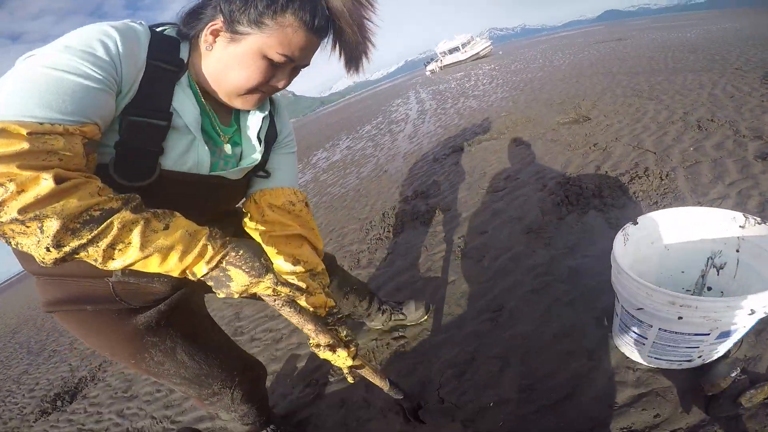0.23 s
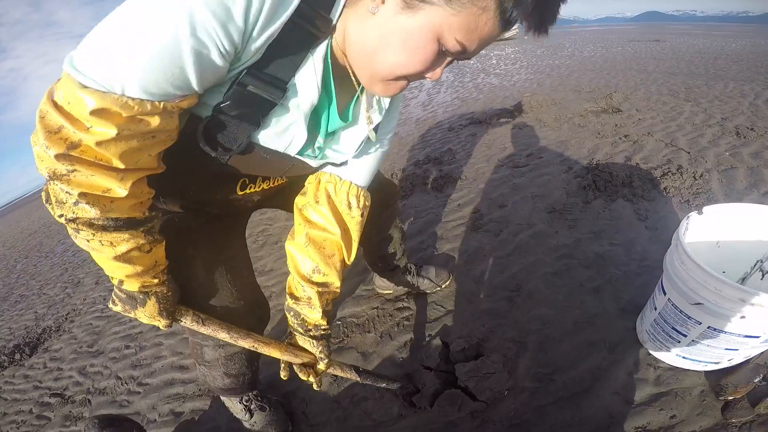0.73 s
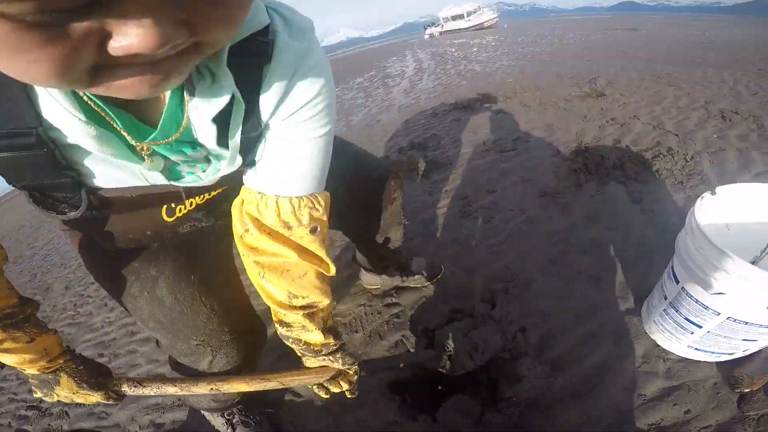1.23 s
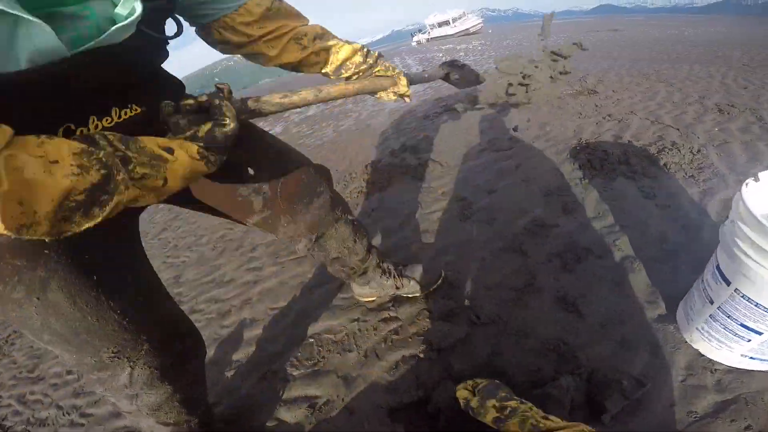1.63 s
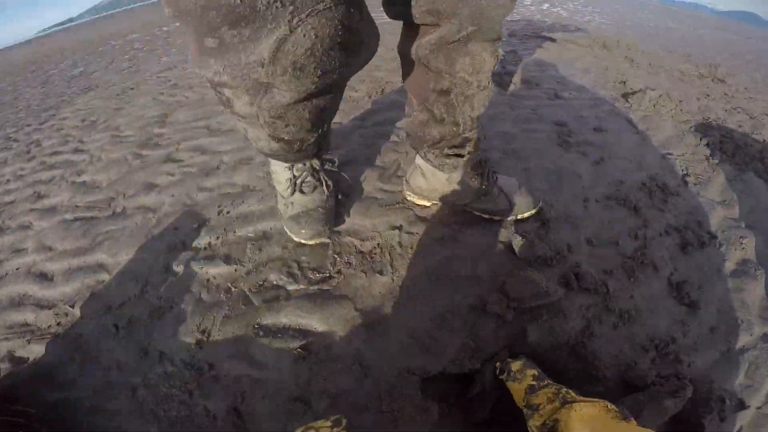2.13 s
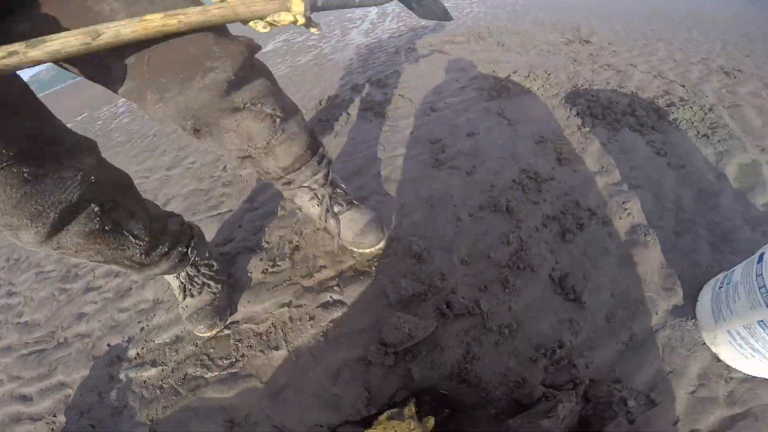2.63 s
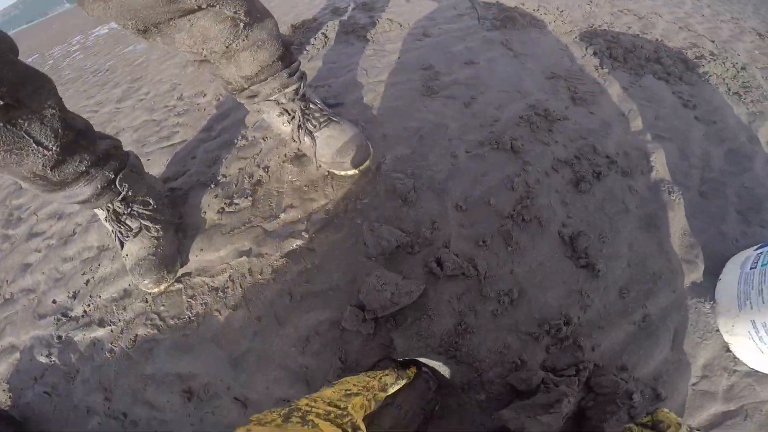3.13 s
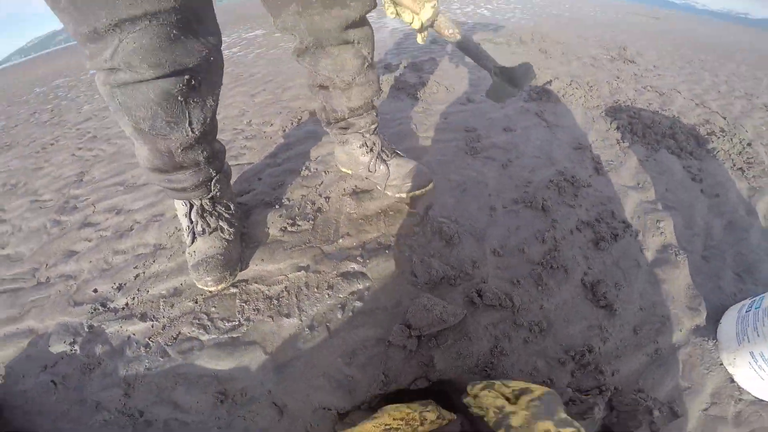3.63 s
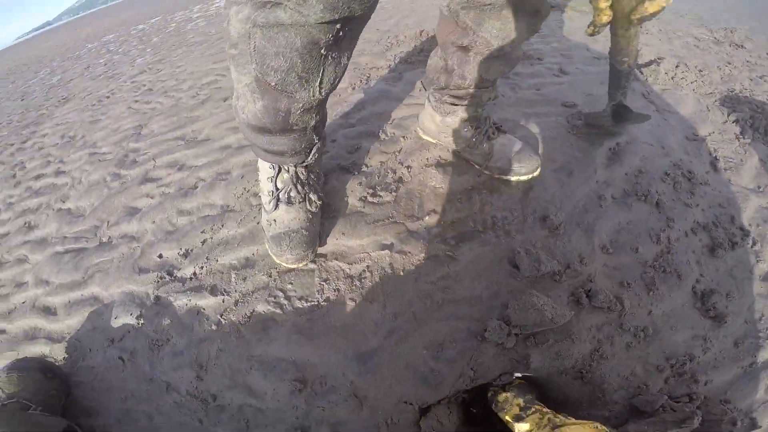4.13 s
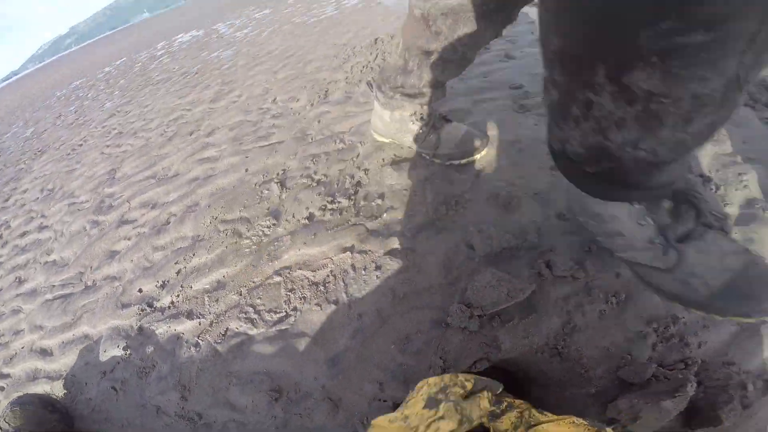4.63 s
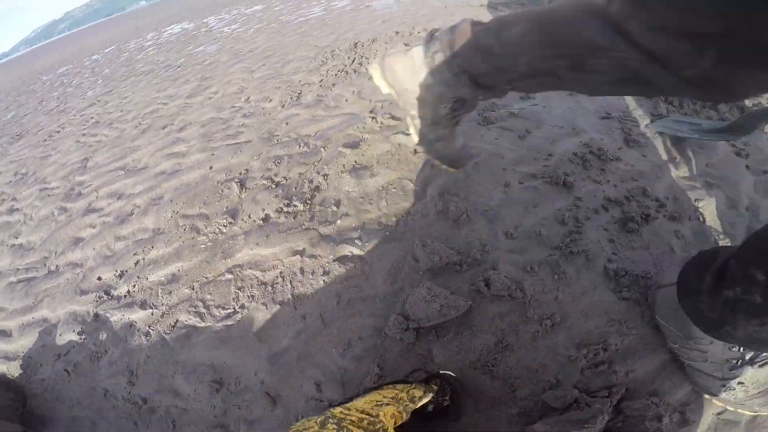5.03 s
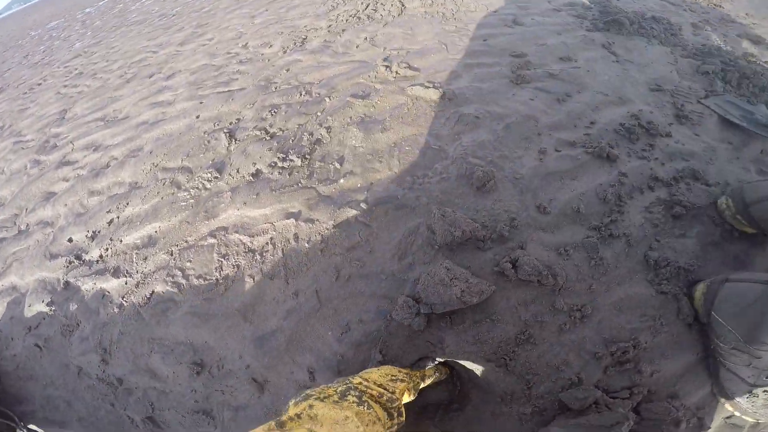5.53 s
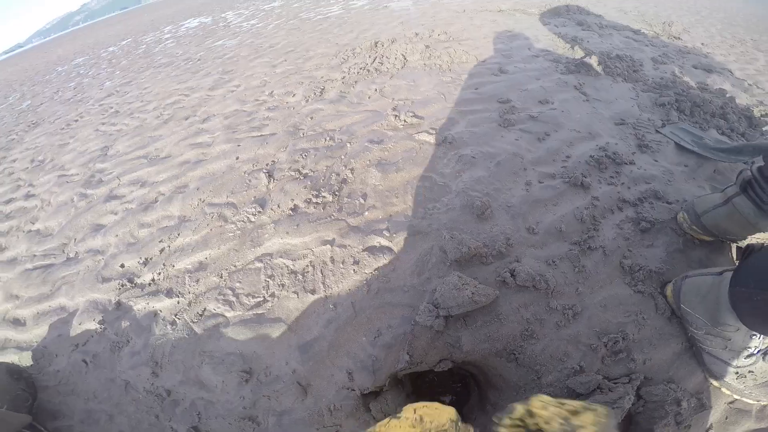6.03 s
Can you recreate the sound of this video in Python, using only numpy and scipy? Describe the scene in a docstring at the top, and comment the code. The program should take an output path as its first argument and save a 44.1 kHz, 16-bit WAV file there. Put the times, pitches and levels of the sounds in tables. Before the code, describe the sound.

An open, echoless beach with low gusting wind and a faint distant hum. A gloved arm works in a wet sand hole: soft cloth swishes, narrow sliding hisses, tiny bubbly squelches and dry ticks. An early cluster of hard blows on the microphone's casing is by far the loudest event; later come brief coarse scrapes just before four and five seconds, and a hollow suction pop.

```python
"""Wind rumbles in gusts over a far hum, then rain gear swishes: digging for a clam on a tidal flat.
A gloved arm works in a wet sand hole, heard from a camera worn on the body.
Cloth and grit are filtered friction noise; squelches are damped bubbles; ticks are dying sines.
Once the camera's case is knocked, ringing in its modes, with a low pulse that falls in pitch.
Wind is levelled low noise under a moving strength; shore noise and wavering tones lie beneath."""
import sys
import numpy as np
from scipy import signal
from scipy.fft import rfft, irfft
from scipy.io import wavfile
from scipy.ndimage import uniform_filter1d

SR = 44100
rng = np.random.default_rng(int(sys.argv[2]) if len(sys.argv) > 2 else 0)


def int16_out(signal):
    """Quantize to a 16-bit WAV file."""
    q = np.round(np.clip(np.atleast_2d(signal).T, -1, 1) * 32767)
    wavfile.write(sys.argv[1], SR, q.astype(np.int16))


N = 277389
T = np.arange(N) / SR  # time in seconds

# Spectrum of rain gear and grit rubbing. Each row: frequency in Hz, relative density in dB per Hz.
RUB_SPECTRUM = [(150, -63), (400, -14), (750, -17), (1250, -10), (1650, -9.5), (2200, -8.5), (2700, -2),
                (3500, 1), (4300, -1.5), (4900, -4), (7600, -7.5), (8900, -15), (11000, -16.5),
                (15000, -28)]
# Resonances and notches of the camera's case. Each row: centre in Hz, width in Hz, lift in dB.
CASE_RESONANCES = [(1562, 53, 6), (1838, 240, 8), (2680, 600, 2), (3230, 97, -7), (3310, 190, 5),
                   (3860, 49, -2.5), (3900, 260, 2), (4280, 260, 4), (4600, 86, -2.5), (5440, 100, -5),
                   (5860, 126, 4.5), (7100, 67, -8), (7390, 330, -1), (10250, 320, 4), (11560, 400, 1.5),
                   (12600, 630, 3), (13900, 640, 9)]


def amp(db):
    """Decibel law: the amplitude gain of a level."""
    return 10 ** (np.asarray(db) / 20)


def unit(x):
    """Normalisation: scales a signal to rms 1."""
    return x / np.sqrt(np.mean(x ** 2) + 1e-20)


def add(mix, s, sound):
    """Superposition: adds a sound into the mix, starting at s seconds."""
    start = max(round(s * SR), 0)
    part = mix[start:][:len(sound)]
    part += sound[:len(part)]


def resonance(hz, centre, width):
    """Resonance curve: 1 at the centre, one half at half the width to either side."""
    return 1 / (1 + (2 * (hz - centre) / width) ** 2)


def colour(x, points, modes=()):
    """Linear filtering: shapes the spectrum by points in Hz and dB, lifted at the resonances."""
    hz = np.fft.rfftfreq(len(x), 1 / SR)
    point_hz, point_db = np.transpose(points)
    db = np.interp(np.log(hz + 1), np.log(point_hz + 1), point_db)
    for centre, width, lift in modes:
        db = db + lift * resonance(hz, centre, width)
    return irfft(rfft(x) * amp(db), len(x))


def wander(rate):
    """Low-passed noise: slow random motion of rms 1, fading out above about rate in Hz."""
    hz = np.fft.rfftfreq(N, 1 / SR)
    lowpass = np.exp(-(hz / rate) ** 2)
    return unit(irfft(rfft(rng.standard_normal(N)) * lowpass, N))


def friction(per_s, spread_db, share):
    """Stick-slip: countless tiny slips hiss, and a share of the power comes as separate grains."""
    sizes = amp(spread_db * np.minimum(rng.exponential(1, N), 4))
    signed_sizes = sizes * rng.choice([-1, 1], N)
    grains = unit(signed_sizes * (rng.random(N) < per_s / SR))
    return np.sqrt(share) * grains + np.sqrt(1 - share) * rng.standard_normal(N)


def stroke(s, length, edge=0.57):
    """Amplitude envelope: one movement swells, holds and fades; edge is the tapered share."""
    out = np.zeros(N)
    add(out, s, signal.windows.tukey(max(int(length * SR), 8), edge))
    return out


def ring(modes, rise=0.00047):
    """Modal decay: a sum of dying sines given as Hz, dB and t60 in seconds, with a soft onset."""
    t = T[:SR // 5]
    onset = 1 - np.exp(-t / rise)
    return sum(amp(db - 60 * t / t60) * np.sin(2 * np.pi * hz * t) for hz, db, t60 in modes) * onset


def patchy(x, depth_db, order=9, size=6):
    """Spectral modulation: shifting patches, order bins wide and size frames long, rise and sink."""
    z = signal.stft(x, nperseg=512)[2]
    field = uniform_filter1d(rng.standard_normal(z.shape), order, axis=0)
    field = uniform_filter1d(field, size, axis=1)
    return unit(signal.istft(z * amp(depth_db * unit(field)), nperseg=512)[1][:N])


def swish(peak_s, db, rise_s, fall_s):
    """Friction power follows speed: one movement gathers speed up to its peak, then slows."""
    drop_db, roundness = 10.5, 1.34  # fall over one rise or fall time; shape of the top
    away = np.maximum((peak_s - T) / rise_s, (T - peak_s) / fall_s)
    return amp(db - drop_db * np.minimum(away, 5) ** roundness) ** 2


def rubbing(level_db=-0.27, flutter_db=0.78, flutter_hz=60, patchy_db=1.63):
    """Sliding friction: sleeve and glove rub on wet sand, each swish with its own brightness."""
    # One swish for each movement of the arm. Each row: fastest moment in seconds, level in dB
    # before the common trim, rise in seconds, fall in seconds, treble against the body in dB.
    arm_movements = [(0.32, -58.5, 0.17, 0.14, -4), (0.46, -54, 0.097, 0.12, -5),
                     (0.81, -46, 0.17, 0.24, -7), (1.26, -55.5, 0.33, 0.03, -7.5),
                     (1.56, -49, 0.14, 0.19, -9), (1.76, -50.5, 0.054, 0.15, -13),
                     (1.99, -50, 0.17, .05, -8), (2.16, -48.5, 0.24, 0.18, -6),
                     (2.43, -55, 0.15, 0.084, -8.5), (2.6, -49, .1, 0.16, -6.5), (2.72, -50, .04, .08, -15),
                     (2.84, -56, .07, 0.077, -7.5), (3.09, -57, .18, .09, -7),
                     (3.33, -55.5, 0.17, 0.18, -10.5), (3.68, -49, .24, 0.42, -10),
                     (4.13, -55.5, 0.3, 0.32, -7), (4.32, -48, 0.047, 0.31, -5),
                     (4.78, -51, 0.13, 0.13, -10), (4.872, -47.5, 0.039, .04, -14),
                     (4.96, -50, 0.1, 0.16, -11), (5.34, -52.5, 0.19, .03, -7),
                     (5.52, -57.5, .09, .2, -7.5), (5.75, -57, .18, 0.22, -11),
                     (5.99, -53.5, 0.16, 0.37, -6.5), (6.21, -57.5, 0.16, .09, -1)]
    rest_db, rest_treble_db = -66, -3  # the gear never keeps quite still
    body_power = amp(rest_db) ** 2
    treble_power = amp(rest_db + rest_treble_db) ** 2
    for s, db, rise, fall, bright_db in arm_movements:
        power = swish(s, db, rise, fall)
        body_power = body_power + power
        treble_power = treble_power + power * amp(bright_db) ** 2
    slips = friction(per_s=1500, spread_db=2.0, share=0.25)
    hiss = patchy(colour(slips, RUB_SPECTRUM, CASE_RESONANCES), patchy_db)
    highpass = signal.butter(3, 6300, "high", fs=SR, output="sos")
    treble = signal.sosfiltfilt(highpass, hiss)
    body = unit(hiss - treble) * np.sqrt(body_power)
    sound = body + unit(treble) * np.sqrt(treble_power)
    return sound * amp(level_db + flutter_db * wander(flutter_hz))  # the contact flutters


def slides(level_db=-1):
    """Resonant friction: sliding fabric hisses in a narrow band."""
    # A sleeve slides. Each row: start in seconds, length in seconds,
    # level in dB before the common trim, band centre in Hz, band width in Hz.
    sleeve_slides = [(0.636, 0.32, -60.5, 1400, 700), (0.717, 0.093, -49.5, 3500, 900),
                     (1.524, 0.092, -52.5, 3720, 900), (1.702, 0.073, -48.5, 2870, 220),
                     (1.714, 0.14, -50.5, 3030, 1600), (2.022, 0.27, -49, 3350, 935),
                     (2.125, 0.08, -54.5, 1820, 300), (4.04, 0.16, -56.5, 3070, 250),
                     (4.301, 0.15, -50, 2660, 500), (4.291, .14, -46.5, 4100, 900),
                     (4.27, .34, -60, 10500, 1100), (4.399, 0.21, -51, 3150, 600)]
    hz, out = np.fft.rfftfreq(N, 1 / SR), np.zeros(N)
    slips = friction(per_s=900, spread_db=-3.0, share=0.77)
    spectrum = rfft(colour(slips, RUB_SPECTRUM, CASE_RESONANCES))
    for s, length, db, centre, width in sleeve_slides:
        band = unit(irfft(spectrum * resonance(hz, centre, width), N))
        out += amp(db + level_db) * band * stroke(s, length, edge=0.32)
    return out


def scrapes():
    """Granular friction: coarse sand dragged over something hard bites quickly and crumbles away."""
    # Each row: peak in seconds, level in dB, rise in seconds, fall in seconds.
    gritty_drags = [(3.808, -40.5, 0.0077, 0.024), (4.816, -38, 0.018, 0.033), (5.335, -52, 0.027, .03)]
    # Spectrum of the grit. Each row: frequency in Hz, relative density in dB per Hz.
    grit_spectrum = [(500, -36), (1200, -9), (2200, -6.5), (3200, 5), (7500, 2), (9000, -4.5),
                     (14500, -15.5)]
    slips = friction(per_s=6400, spread_db=4.0, share=0.57)
    grit = unit(colour(slips, grit_spectrum, CASE_RESONANCES))
    return grit * np.sqrt(sum(swish(*row) for row in gritty_drags))


def squelches(per_s=500, scatter=0.088, cycles=9, glide=0.056):
    """Bubble resonance: each squeeze frees a cluster of heavily damped bubbles that rise in pitch."""
    # Water squeezed out of the sand. Each row: start in seconds, span of bubble starts in seconds,
    # level in dB, middle of the bubbles' starting pitches in Hz.
    squeezes = [(1.978, 0.034, -61, 980), (2.521, .05, -65, 670), (2.558, 0.13, -58, 1150),
                (3.53, 0.022, -58.5, 1030), (4.177, 0.1, -63.5, 1280), (4.806, .1, -65.5, 1270),
                (5.209, 0.16, -65, 304)]
    out, t = np.zeros(N), T[:SR // 25]
    for s, length, db, pitch in squeezes:
        cluster = np.zeros(int(length * SR) + len(t))
        for when, size, spread in rng.random((int(per_s * length) + 1, 3)):
            hz = pitch * np.exp(scatter * 2 * (2 * spread - 1))
            age = hz * t / cycles  # reaches 1 when the bubble has sunk by 60 dB
            bubble = amp(-60 * age) * np.sin(2 * np.pi * hz * t * (1 + glide * age))
            add(cluster, when * length, (1 + size) * bubble)
        level = np.sqrt(length * SR / np.sum(cluster ** 2))
        add(out, s, amp(db) * cluster * level)
    return out


def ticks():
    """Impulse response: snaps and drips in the wet sand ring as one or a few dying sines."""
    # One dying sine a row; rows close together build one tick.
    # Each row: start in seconds, level in dB before the ring's gain, pitch in Hz, t60 in seconds.
    snap_sines = [(1.6504, -18.5, 4200, 0.0056), (1.6508, -34.5, 1690, 0.016), (1.6508, -29, 2730, 0.0047),
                  (1.906, -38, 4250, .006), (1.9265, -22, 3480, 0.0036), (1.9272, -29, 4630, .005),
                  (1.928, -37, 1960, 0.01), (2.026, -55, 680, 0.053), (2.561, -53, 687, 0.063),
                  (2.592, -40.5, 1250, 0.017), (2.654, -51, 960, 0.031), (4.876, -38, 2150, 0.0089),
                  (5.075, -45, 3900, 0.0054), (5.1192, -32, 3880, 0.0061), (5.119, -42, 10000, .002),
                  (5.187, -44, 11500, .003), (5.236, -37.5, 3730, 0.0089), (5.935, -43, 11630, .005)]
    out = np.zeros(N)
    for s, db, hz, t60 in snap_sines:
        add(out, s, amp(db) * ring([(hz, 2, t60)], rise=0.00037))
    return out


def plops():
    """Cavity resonance: suction lets go, and brief noise is coloured by the wet hole."""
    # Each row: start in seconds, length in seconds, level in dB.
    releases = [(5.818, .008, -45.5), (5.8202, 0.0027, -45), (5.824, 0.015, -53)]
    # Spectrum of the suction. Each row: frequency in Hz, relative density in dB per Hz.
    suction_spectrum = [(150, -12), (450, 4), (1600, 0), (2200, -6), (3800, -4), (5500, -7), (8200, -5),
                        (11000, -24)]
    # Resonances of the hole. Each row: centre in Hz, width in Hz, lift in dB.
    hole_resonances = [(490, 240, 6), (890, 250, 4.9), (1520, 170, 17), (2780, 500, 13)]
    gulp = unit(colour(rng.standard_normal(N), suction_spectrum, hole_resonances))
    return gulp * sum(amp(db) * stroke(s, length) for s, length, db in releases)


def knock(chatter_db=-44):
    """Impact excitation: quick blows ring the case's modes and crack, while it chatters in its mount."""
    # Each row: start in seconds, gain of the ring in dB, crack level in dB, crack t60 in seconds.
    blows = [(1.031, -26.5, -35.5, 0.041), (1.039, -43, -24.5, 0.038), (1.0433, -26.5, -28, 0.017),
             (1.0632, -30, -44, 0.01), (1.074, -25.5, -40, 0.008), (1.077, -36, -34, 0.027)]
    # Modes of the camera's case. Each row: frequency in Hz, relative level in dB, t60 in seconds.
    shell_modes = [(1150, -15, .012), (1560, -10, .022), (1840, -6, .016), (1960, -1, .022),
                   (2140, -9, .02), (2350, -7, .016), (2760, -12, .016), (3130, -13, .03), (3760, -14, .03),
                   (4480, -12, .025), (5380, -11, .025), (5900, -14, .025), (6900, -15, .02)]
    # Spectrum of each blow's grating. Each row: frequency in Hz, relative density in dB per Hz.
    crack_spectrum = [(150, 10.5), (400, -9.5), (800, -18), (1200, -6), (3000, -3), (4500, 0), (7300, -3),
                      (8800, -8), (10500, -7.5), (15000, -9.5)]
    out, cracks, t = np.zeros(N), np.zeros(N), T[:SR // 2]
    for s, ring_db, crack_db, t60 in blows:
        add(out, s, amp(ring_db) * ring(shell_modes))
        add(cracks, s, amp(crack_db - 60 * t / t60))
    out += cracks * unit(colour(rng.standard_normal(N), crack_spectrum))
    chatter = unit(colour(rng.standard_normal(N), RUB_SPECTRUM, CASE_RESONANCES))
    return out + amp(chatter_db) * stroke(blows[0][0], 0.063, edge=0.17) * chatter


def low_pulse(start_s=1.042, final_hz=26.8, peak_db=-15.5, extra_hz=30, settle_s=0.02, crest_s=0.02):
    """Falling-pitch low pulse: the recorder's high-pass answers the knock with a dying thump."""
    out, t = np.zeros(N), T[:SR // 2]
    turns = np.cumsum(final_hz + extra_hz * np.exp(-t / settle_s)) / SR
    swell = t / crest_s * np.exp(1 - t / crest_s)  # reaches 1 at crest_s
    add(out, start_s, -amp(peak_db) * swell * np.sin(2 * np.pi * turns))
    return out


def wind(lumpy_db=1.0, lumpy_hz=9):
    """Turbulent pressure: eddies buffet the case in an uneven breeze with a few stronger gusts."""
    # Strength of the breeze before its lumps. Each row: time in seconds, level in dB.
    breeze_strength = [(0.0, -45), (0.3, -40), (0.75, -47.5), (1.0, -44.5), (1.5, -36.5), (2.2, -41),
                       (2.7, -37.5), (3.3, -40.5), (3.9, -34), (4.35, -40.5), (4.7, -35.5), (5.1, -36),
                       (5.5, -42.5), (6.28, -34.5)]
    # Single gusts on top of it. Each row: start in seconds, length in seconds, level in dB.
    gust_times = [(0.096, 0.19, -35.5), (1.12, .15, -35), (2.844, 0.23, -32.5), (3.525, 0.14, -28),
                  (3.668, 0.21, -29), (5.717, 0.097, -32), (5.911, 0.25, -32.5)]
    # Spectrum of the eddies. Each row: frequency in Hz, relative density in dB per Hz.
    rumble_spectrum = [(8, -8.5), (18, 5), (27, 7), (35, 1), (48, -14), (62, -27), (80, -46), (110, -60),
                       (200, -64)]
    breeze_db = np.interp(T, *np.transpose(breeze_strength))
    breeze = amp(breeze_db + lumpy_db * wander(lumpy_hz))
    gusts = sum(amp(db) * stroke(s, length, edge=0.59) for s, length, db in gust_times)
    eddies = colour(rng.standard_normal(N), rumble_spectrum)
    # A running rms evens the noise out, so that breeze and gusts alone set its level.
    eddies /= np.sqrt(uniform_filter1d(eddies ** 2, size=SR // 12, mode="wrap") + 1e-20)
    return eddies * np.hypot(breeze, gusts)


def background(wash_db=-61, drift_hz=0.59, waver_db=0.1):
    """Incoherent sum: the open shore's wash of noise, and steady tones that waver a little."""
    # Spectrum of sea and air far off. Each row: frequency in Hz, relative density in dB per Hz.
    air_spectrum = [(70, 9), (110, 4.5), (180, -0.5), (240, -1.5), (350, -3), (520, -7), (900, -6.5),
                    (2000, -14), (4000, -8.5), (8000, -21.5), (15000, -31.5)]
    # A far engine's two low hums and the camera's own thin electronic whine.
    # Each row: mean pitch in Hz, rms level in dB.
    steady_tones = [(136.2, -68), (272.6, -77.5), (15081, -77.5)]
    wash = unit(colour(rng.standard_normal(N), air_spectrum, CASE_RESONANCES))
    out = amp(wash_db + 2.2 * wander(5.9)) * wash
    for hz, db in steady_tones:
        turns = np.cumsum(hz + drift_hz * wander(5.2)) / SR
        out += np.sqrt(2) * amp(db + waver_db * wander(4.5)) * np.sin(2 * np.pi * turns)
    return out


def scene():
    """Superposition: every source adds at the one microphone."""
    digging = rubbing() + slides() + scrapes() + squelches() + ticks() + plops()
    return (digging + knock() + low_pulse() + wind() + background())[None]


def record(dry, edge_hz=15350):
    """Band limitation: a linear-phase low-pass ends the recorder's treble."""
    lowpass = signal.firwin(511, edge_hz, window=("kaiser", 9), fs=SR)
    return signal.oaconvolve(dry, lowpass[None], "same")


dry = scene()
out = record(dry)
int16_out(out)
```